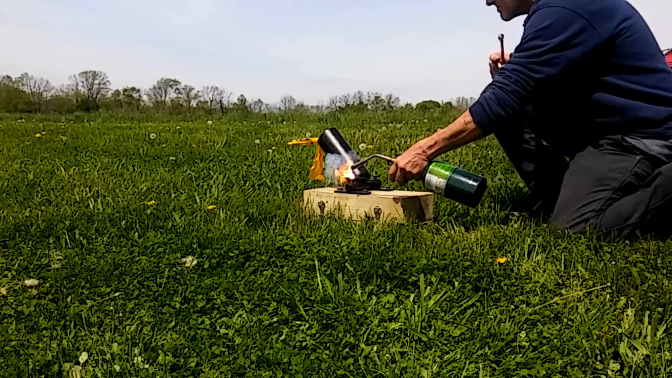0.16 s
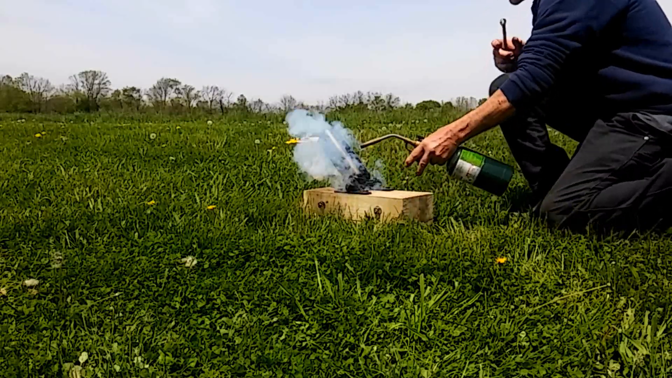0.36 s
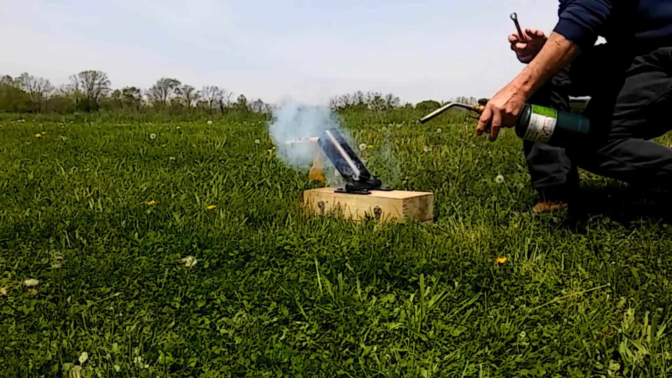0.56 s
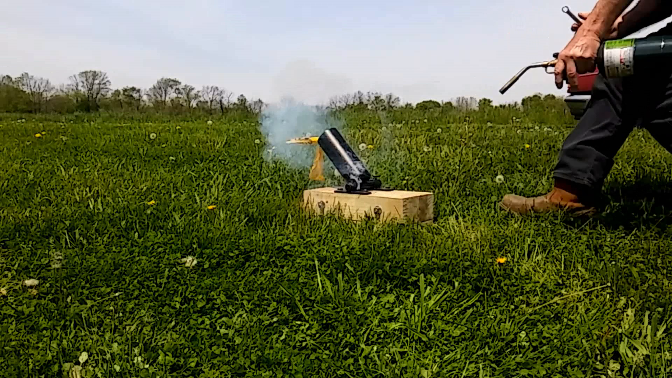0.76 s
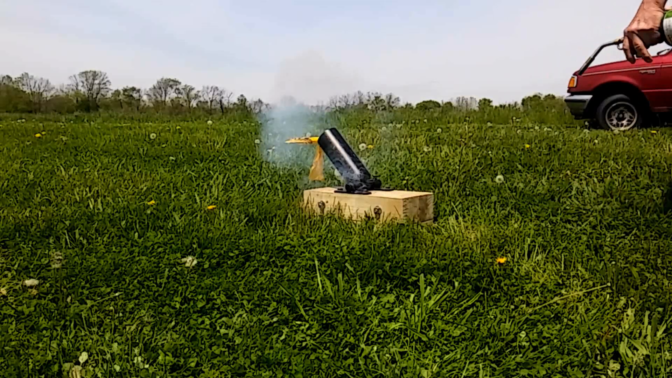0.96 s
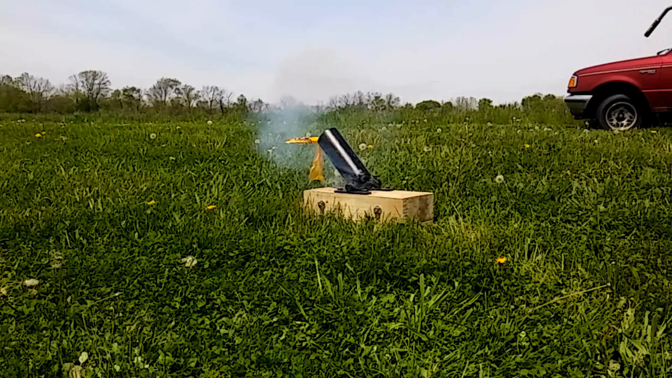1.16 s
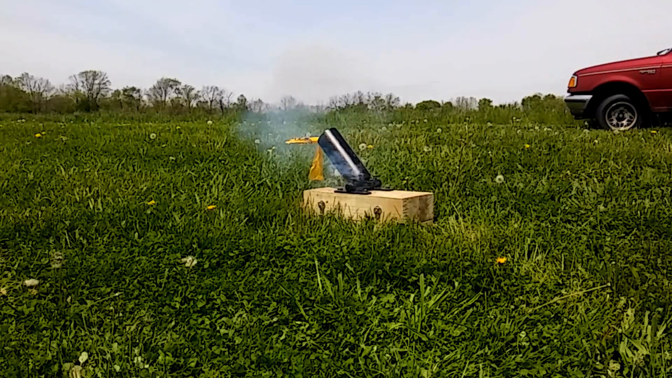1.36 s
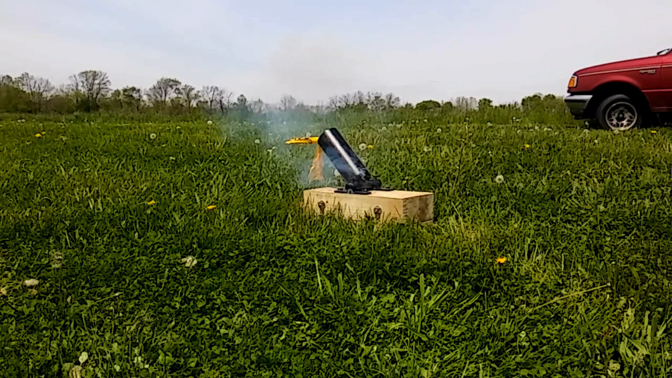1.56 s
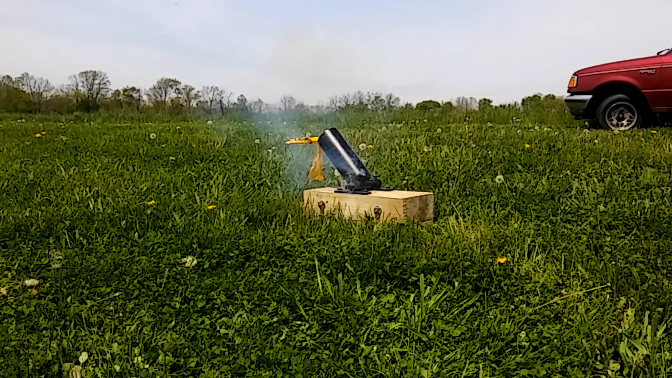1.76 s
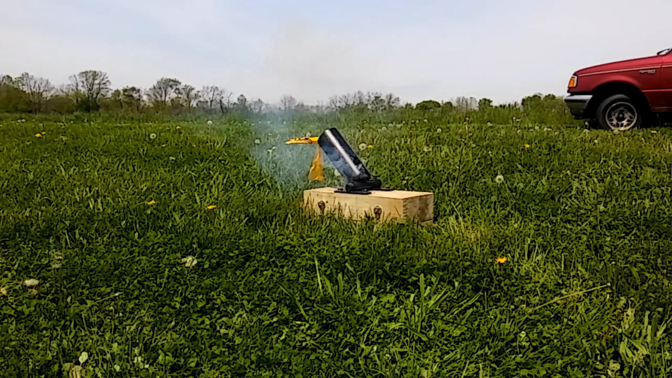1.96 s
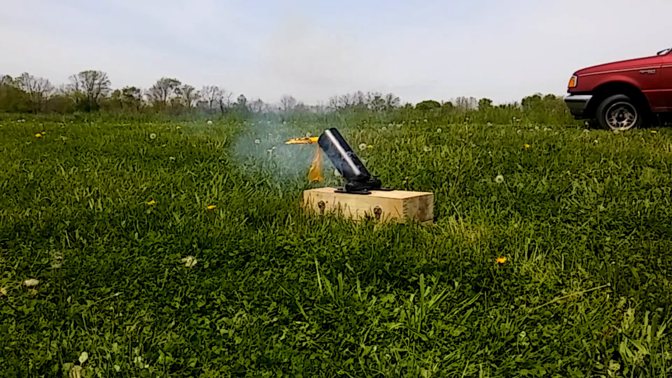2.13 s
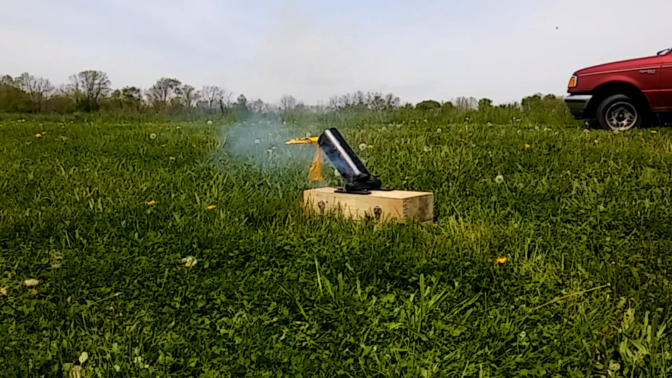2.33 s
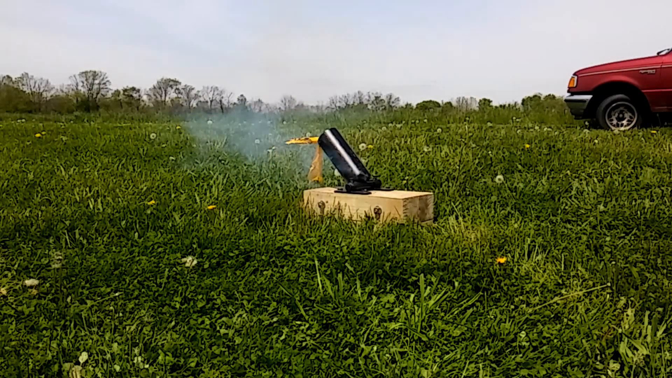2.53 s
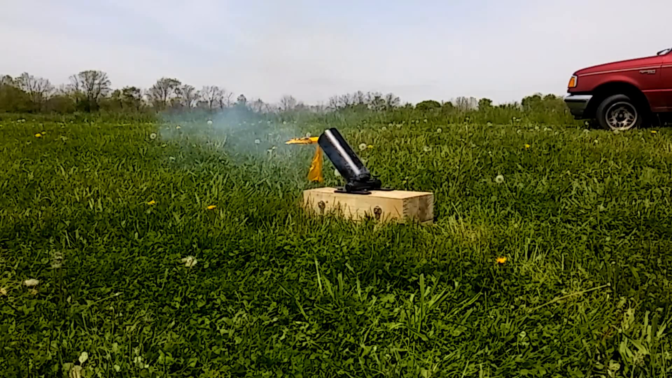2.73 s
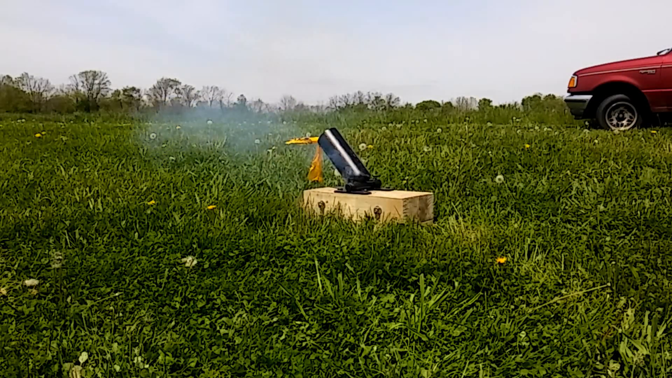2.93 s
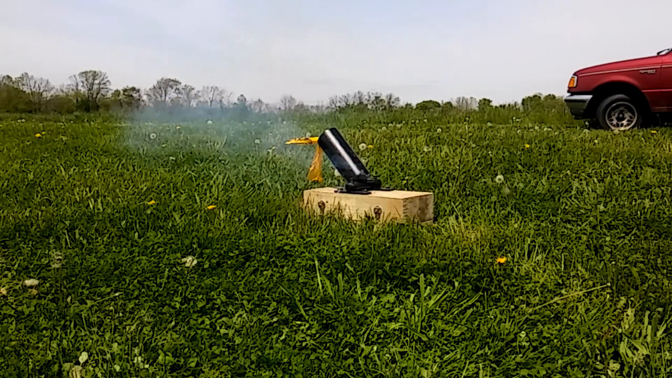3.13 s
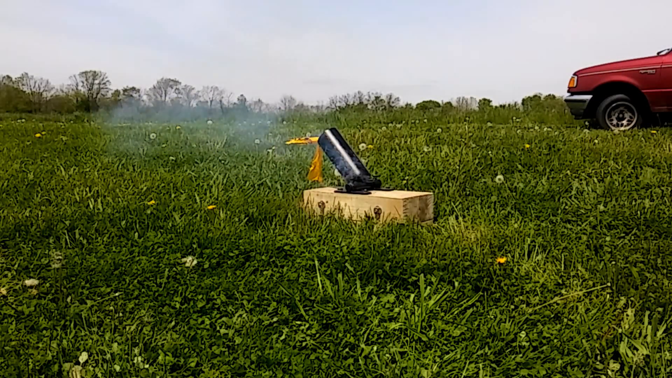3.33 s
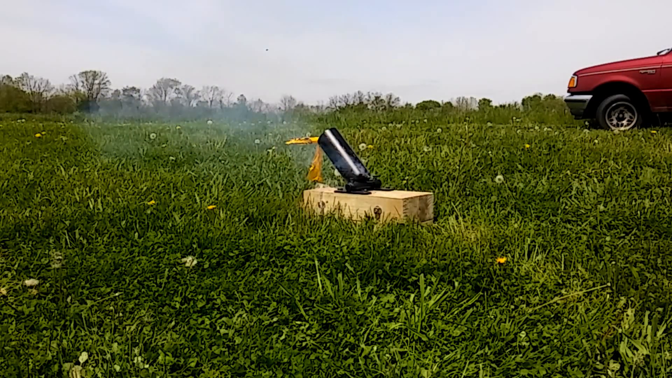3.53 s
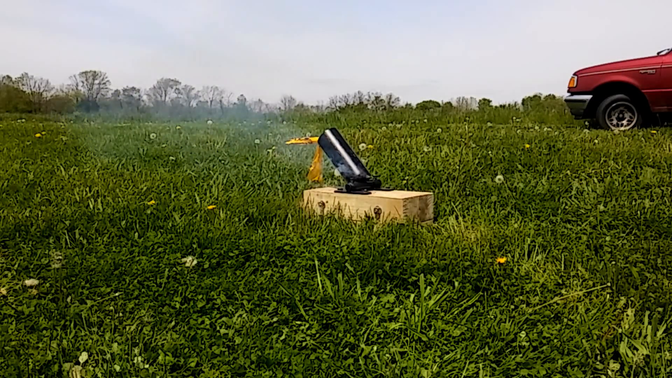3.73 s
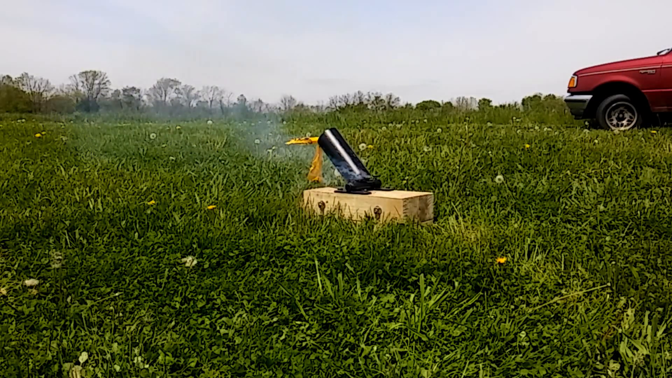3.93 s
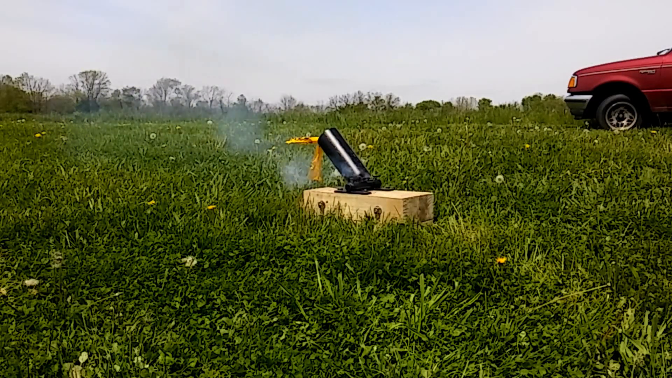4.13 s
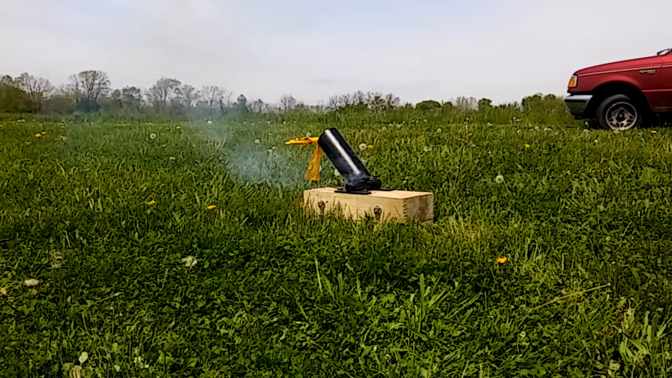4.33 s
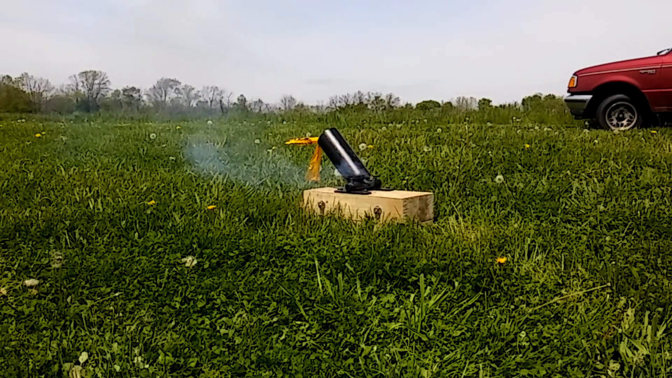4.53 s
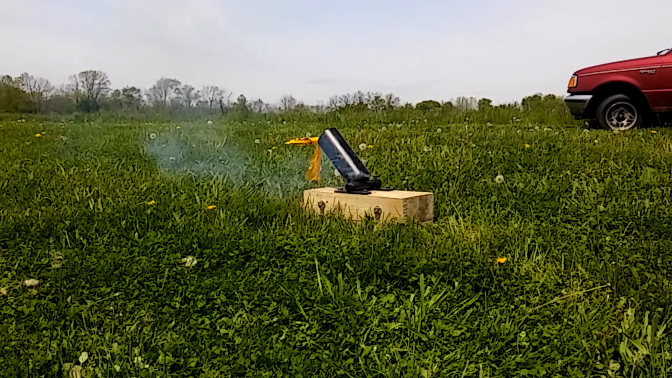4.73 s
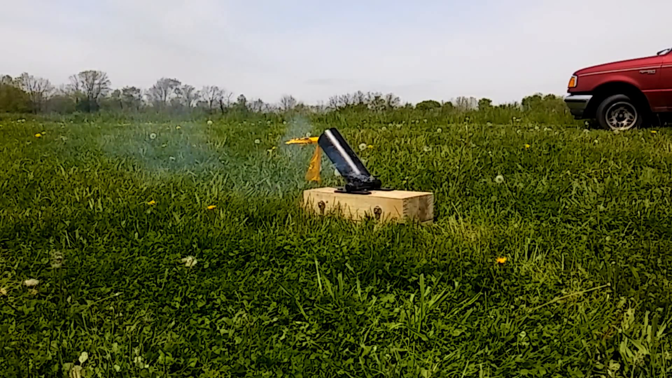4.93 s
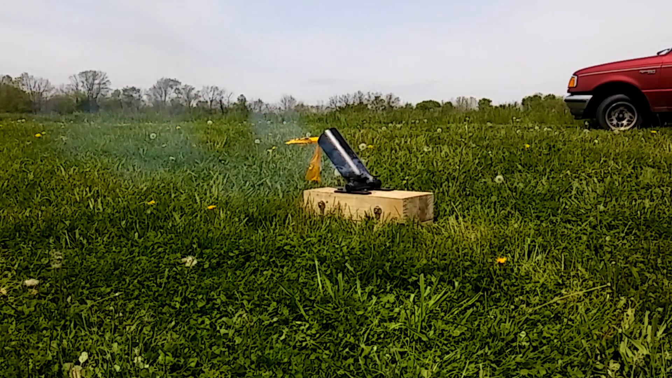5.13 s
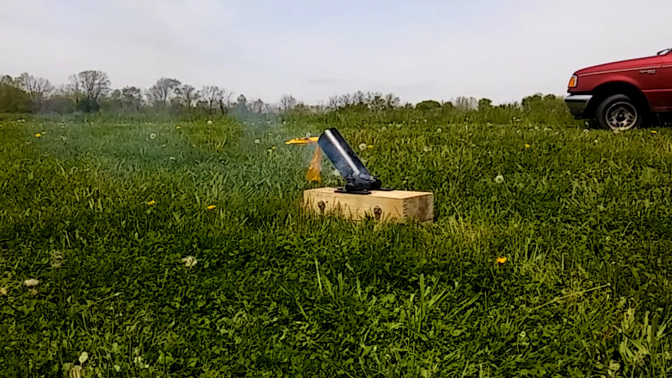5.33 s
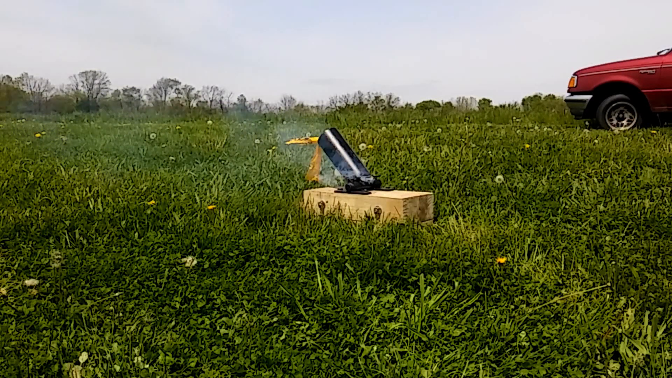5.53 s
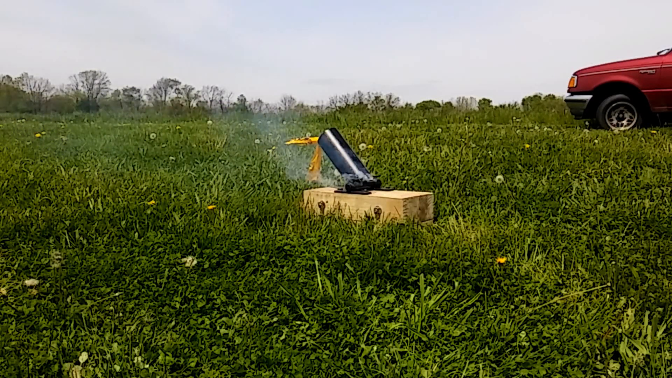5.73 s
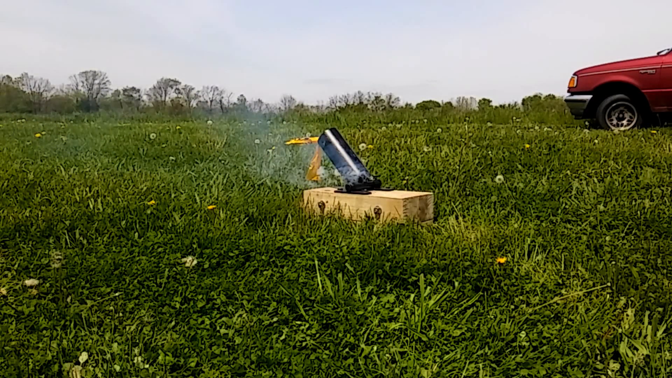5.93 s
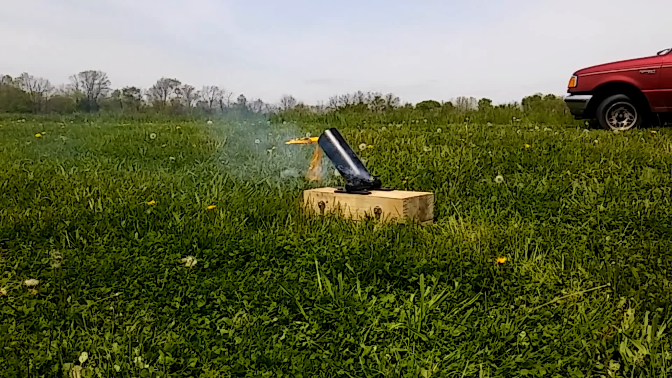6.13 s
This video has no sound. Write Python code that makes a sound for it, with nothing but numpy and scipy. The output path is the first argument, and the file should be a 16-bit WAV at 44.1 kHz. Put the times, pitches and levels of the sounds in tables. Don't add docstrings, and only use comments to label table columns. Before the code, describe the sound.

Brief fluttering torch flame, a few torn whistles as a fuse catches, then steady bright uneven fizzing hiss outdoors with faint thuds and ticks.

```python
import sys
import numpy as np
from scipy import signal
from scipy.fft import rfft, irfft, next_fast_len
from scipy.io import wavfile
from scipy.ndimage import uniform_filter1d, map_coordinates

SR = 44100
rng = np.random.default_rng(int(sys.argv[2]) if len(sys.argv) > 2 else 0)


def master_out(mix):
    frames = np.transpose(np.atleast_2d(mix))
    ceiling = np.clip(frames, -1, 1)
    pcm = np.round(ceiling * 32767).astype(np.int16)
    wavfile.write(sys.argv[1], SR, pcm)


def gain_from_db(level_db):
    decades = np.asarray(level_db, float) / 20
    return 10 ** decades


N = 277464
TIME = np.arange(N) / SR


def curves(table):
    s, *columns = np.transpose(table)
    return [np.interp(TIME, s, column) for column in columns]


def colour(x, points):
    hz, db = np.transpose(points)
    size = next_fast_len(len(x))
    log_hz = np.log(np.arange(size // 2 + 1) * SR / size + 1)
    gain = gain_from_db(np.interp(log_hz, np.log(hz), db))
    return irfft(rfft(x, size) * gain, size)[:len(x)]


def band(x, lo_hz, hi_hz, order=2):
    return signal.sosfilt(signal.butter(order, [lo_hz, hi_hz], "band", fs=SR, output="sos"), x)


def unit(x):
    return x / np.sqrt(np.mean(x ** 2))


def noise():
    return rng.standard_normal(N)


def walk(rate_hz):
    hold = int(SR / rate_hz)
    steps = np.repeat(rng.standard_normal(N // hold + 1), hold)
    smooth = uniform_filter1d(uniform_filter1d(steps, hold), hold)
    return unit(smooth[:N])


def slowly(shape, table):
    t = TIME[::32]
    return np.interp(TIME, t, sum(shape(t, *row) for row in table))


def bumps(table, size):
    def bell(t, s, height, half):
        return size(height) * np.exp(-((t - s) / half) ** 2)
    return slowly(bell, table)


def knocks(table, sag=0., rise=1.):
    out = np.zeros(N)
    for s, db, hz, cycles in table:
        span = slice(max(int((s - .1) * SR), 0), int((s + .1) * SR))
        turns = (TIME[span] - s) * hz
        length = cycles * np.where(turns < 0, rise, 2 - rise)
        swell = np.exp(-2 * (turns / length) ** 2)
        out[span] += gain_from_db(db) * swell * np.sin(2 * np.pi * turns * (1 - sag * np.tanh(turns)))
    return out


def torch():
    # time in seconds, peak in dB, pitch in Hz, length in cycles.
    puffs = [(.006, -33, 590, 7), (.028, -28.5, 598, 10.7), (.0552, -26.5, 626, 2.2), (.0617, -30, 624, 5.),
             (.0698, -32, 615, 5.), (.0812, -32, 605, 4.8), (.0945, -28, 603, 8.1), (.111, -29, 624, 5.5),
             (.136, -27.5, 590, 6.2), (.147, -25, 575, 5), (.147, -38, 1120, 12), (.2, -31, 428, 5.3),
             (.177, -31, 586, 9), (.193, -26, 570, 10.5), (.206, -30, 540, 4.8), (.222, -21, 590, 1.9),
             (.245, -35, 590, 6), (.26, -28, 527, 2.9), (.283, -27.5, 606, 3.9), (.302, -31, 650, 5.4),
             (.1, -38, 1100, 6), (.228, -42, 1000, 5), (.312, -43, 750, 8), (.347, -43, 353, 5),
             (.385, -39, 547, 6)]
    # time in seconds, change in dB, half length in seconds.
    gutters = [
        (.044, -3, 0.0055),
        (.125, -5, 0.0055),
        (.158, 3, .006),
        (.233, -1, .005),
        (.272, 0, .004),
    ]
    # pitch in Hz, level in dB per Hz.
    roar_tone = [(50, -54), (110, -26.5), (210, -8.5), (450, -7), (600, -9), (750, -10), (1100, -18),
                 (1300, -26), (1500, -60), (2500, -100)]
    # pitch in Hz, level in dB per Hz.
    nozzle_tone = [(780, -45), (1330, -8.5), (1810, 0.5), (2220, -5.5), (2390, -2), (2730, -5),
                   (3460, -5.5), (3640, -4), (3750, -12.5), (4610, -5.5), (6340, -10), (6540, -8.5),
                   (7950, -11), (9470, -21), (15500, -31)]
    # pitch in Hz, gain in dB.
    ground_dip = [(1150, 0.5), (1340, -8), (1600, 0)]

    tube_hz, tube_width_hz, tube_db = 590., 54, -41.5
    tube = unit(band(noise(), tube_hz - tube_width_hz / 2, tube_hz + tube_width_hz / 2, order=1))
    singing = knocks(puffs) + tube * gain_from_db(tube_db) * np.interp(TIME, [.3, .34], [1, 0])

    roar_shut_s, roar_fall_db_s = .31, 112
    roar_db = -37.5 - np.clip(roar_fall_db_s * (TIME - roar_shut_s), 0, 19.)
    flutter_db = bumps(gutters, float) + 1.0 * walk(52.0)
    roar = unit(colour(noise(), roar_tone)) * gain_from_db(roar_db + flutter_db)
    roar = roar * np.interp(TIME, [.45, .62], [1, 0])

    nozzle_turn_s, nozzle_fall_db_s = 0.29, 28.
    nozzle_db = -40.5 - nozzle_fall_db_s * np.maximum(TIME - nozzle_turn_s, 0)
    nozzle = unit(colour(noise(), nozzle_tone)) * gain_from_db(nozzle_db)
    nozzle = nozzle * np.interp(TIME, [.28, .5], [1, 0])
    return singing, colour(roar, ground_dip), colour(nozzle, ground_dip)


def gusts():
    # time in seconds, peak in dB, half length in seconds.
    wind_puffs = [(0.0, -50, 0.026), (.4, -63, .03), (.48, -65, .02), (1.72, -65, .05), (2.08, -73, 0.022),
                  (2.28, -56, 0.046), (2.91, -66, 0.13), (3.108, -64, 0.037), (3.35, -57, 0.086),
                  (3.515, -54, 0.018), (3.593, -61, .025), (3.67, -71, .06), (3.94, -58, 0.033),
                  (4.13, -54.5, 0.05), (4.375, -54, 0.06), (4.25, -67, 0.045), (4.49, -61, .03),
                  (4.57, -52.5, 0.039), (4.676, -50, 0.033), (4.743, -49.5, 0.022), (4.846, -54, 0.064),
                  (4.938, -62, 0.065), (5.04, -55, 0.079), (5.25, -59, 0.065), (5.582, -55.5, 0.1),
                  (6.22, -60, 0.021), (6.282, -50, 0.017)]
    calm_db = -70
    return gain_from_db(calm_db) + bumps(wind_puffs, gain_from_db)


def air():
    # time in seconds, murmur in dB, its upper part (from 360 Hz) against it in dB.
    air_levels = [(.5, -56, -0.2), (.95, -58, -1), (1.1, -59, -1), (1.45, -54, -2), (1.8, -59, -1),
                  (2.3, -57.5, 0.5), (2.7, -60.5, 1.1), (3.2, -58, -0.5), (3.45, -59, -2), (3.6, -58.5, -1),
                  (3.95, -60.5, 1), (4.3, -60, -2), (4.65, -60.5, -1), (4.95, -58.5, -1), (5.2, -60, -1),
                  (5.55, -60, -2.5), (5.95, -57.5, -4), (6.3, -59.5, -5)]
    # time in seconds, level in dB.
    rustle = [(.45, -1), (.53, 10), (.62, 0), (.9, 1.5), (1.02, 6.5), (1.2, -1), (1.7, 2.5), (2.1, 2),
              (2.3, 1), (2.6, -1), (2.75, 3), (2.9, -5), (3.1, -1), (3.9, 3), (4.3, 1), (5., 2), (5.9, 0.5),
              (6.3, -2)]
    # pitch in Hz, level in dB per Hz.
    field_tone = [(12, -54), (20, -31), (27, -13), (47, -27), (113, -2), (178, -5), (300, -3), (448, -2),
                  (669, -2.5), (901, -4.5), (1300, -22), (1690, -18), (2860, -120)]
    # pitch in Hz, level in dB per Hz.
    wind_tone = [(8.8, -50), (15, -26), (22, -21), (45, 3), (64, 8), (92, 7.5), (203, 6), (300, -20),
                 (390, -44), (660, -120)]

    murmur, field = unit(colour(noise(), field_tone)), 0
    air_db, upper_db = curves(air_levels)
    rustle_db = curves(rustle)[0]
    edges_hz = [10, 180, 360, 600, 900, 4000]
    for lo_hz, hi_hz in zip(edges_hz, edges_hz[1:]):
        mask = [(lo_hz / 1.15, -40), (lo_hz, -6), (lo_hz * 1.15, 0),
                (hi_hz / 1.15, 0), (hi_hz, -6), (hi_hz * 1.15, -40)]
        if hi_hz == 4000:
            part_db = rustle_db + 1.2 * walk(12.)
        else:
            part_db = (hi_hz in (600, 900)) * upper_db + 1.5 * walk(12.)
        field = field + colour(murmur, mask) * gain_from_db(part_db)
    wind = unit(colour(noise(), wind_tone)) * gusts() * gain_from_db(-4.5 + 1.2 * walk(24.83))
    return field * gain_from_db(air_db + 2.16 + 0.45 * walk(16.0)) + wind


def flares():
    # time in seconds, jump in dB (minus: the jet chokes), fade in seconds.
    flare_rows = [(.342, 4, .015), (.39, 2.5, .015), (.445, 2, 0.053), (.685, 1, 0.018), (.788, 6, 0.0079),
                  (1.351, 1, .006), (1.468, 2, 0.025), (2.552, 0.5, .03), (2.842, -0.5, .03),
                  (3.402, -0.5, .015), (5.207, 0.5, .03), (1.52, 2.5, 0.017), (2.101, 2.5, .012),
                  (2.228, 4.5, 0.016), (2.57, -0.5, .03), (2.95, 2.5, 0.044), (3.294, 4, 0.019),
                  (3.392, 1.5, 0.022), (4.05, 1.5, .015), (4.185, 1, 0.016), (4.69, 0, .015), (5.2, 1, .03),
                  (5.535, -2.5, .04), (5.577, 2.5, 0.028), (5.86, 2, 0.026), (5.93, 1.5, .03)]

    def flare(t, s, db, fade):
        return db * np.exp(-np.maximum(t - s, 0) / fade) * (t >= s)
    return slowly(flare, flare_rows)


def chokes():
    # deepest moment in seconds, depth in dB, sinking time in seconds, recovery time in seconds.
    choke_rows = [(.33, 4, 0.023, 0.022), (.37, -1, .02, .03), (.42, 1, .02, 0.033),
                  (.6, 3.5, 0.098, 0.084), (.74, 3.5, 0.019, 0.15), (.93, 2.5, 0.046, 0.037),
                  (1.03, 2.5, 0.024, 0.18), (1.42, 7, 0.17, 0.11), (1.438, 4.5, .012, .008),
                  (2.547, 4, 0.042, .006), (5.143, 2.5, .015, .01), (1.57, 2.5, .03, 0.085),
                  (1.74, 2.5, 0.037, 0.061), (2.05, 5, 0.059, 0.097), (2.092, 2.5, .015, .008),
                  (2.15, 3.5, 0.022, .12), (2.4, 5, 0.086, 0.13), (2.455, 2.5, 0.018, 0.018),
                  (2.72, 3, 0.083, 0.032), (2.825, 2.5, 0.041, 0.065), (3.28, 2.5, 0.032, .012),
                  (3.39, 2, 0.1, 0.013), (3.382, 5.5, .015, 0.011), (4.56, -1, .04, 0.022),
                  (5.19, 2.5, .03, .008), (4.705, 1, .02, .012), (4.07, 4, 0.14, .03),
                  (4.13, 3.5, 0.033, .02), (4.2, 4.5, 0.053, 0.099), (4.44, 1.5, 0.027, 0.088),
                  (4.61, 5, 0.018, 0.075), (4.7, 4.5, 0.1, 0.034), (5.15, 7.5, 0.1, 0.078),
                  (5.55, 5, 0.17, 0.063), (5.75, 6, 0.063, .11), (5.9, 2, 0.034, 0.095),
                  (5.99, 6.5, 0.059, 0.15), (6.22, 3.5, 0.095, 0.078), (6.245, 1.5, .02, .015),
                  (3.605, 3, .02, .02), (3.685, 2.5, 0.039, .015), (4.03, 1.5, .02, .02),
                  (4.48, 2, .03, .02), (5.72, 0.5, .03, .02)]

    def choke(t, s, db, sink, back):
        return np.interp(t, [s - sink, s, s + back], [0, -db, 0])
    return slowly(choke, choke_rows)


def eddies(x):
    depth_db, width_hz, life_s = 1.65, 170., .03
    hz, s, cells = signal.stft(x, SR, nperseg=1024)
    patches = rng.standard_normal((200, 400))
    place = np.meshgrid(hz / width_hz, s / life_s, indexing="ij")
    gain = gain_from_db(depth_db * map_coordinates(patches, place, order=1))
    return signal.istft(cells * gain, SR, nperseg=1024)[1][:N]


def fuse():
    # time in seconds, strength in dB,
    # swing away from the microphone in dB (more is duller).
    burn = [(.2, -46.5, 3), (.46, -40.5, 3), (.6, -39.5, 1), (1.2, -40.5, -0.5), (1.9, -41.5, 0.5),
            (2.3, -39, -0.5), (2.9, -40, 0.5), (3.3, -42.5, 0.5), (3.55, -41.5, 1), (3.9, -40, 3),
            (4.4, -40.5, 0.5), (4.8, -43, 1.5), (5.05, -45, 3), (5.24, -39.5, -2.5), (5.36, -43, 2.5),
            (5.62, -41, -4.5), (5.9, -41, -1.5), (6.3, -42.5, -2.5)]
    # time in seconds, share from 0 to 1.
    creeping = [
        (0, 0.03),
        (2., 0),
        (3.6, 0.33),
        (4.3, 0.74),
        (5., 0.99),
        (6.3, 0.94),
    ]
    # pitch in Hz, level in dB per Hz.
    far_tone = [(850, -58), (1450, -25.5), (1590, -18), (1800, -10), (2200, -12.5), (2500, -7), (3250, -9),
                (3620, -8.5), (4030, -10.5), (4400, -8.5), (6670, -1), (7440, -4), (8140, -9), (9820, -13),
                (11200, -19), (14200, -17.5), (15500, -20.5)]
    # pitch in Hz, level in dB per Hz.
    near_tone = [(820, -47), (1400, -64), (1690, -17), (2140, -5), (2640, -12.5), (3190, -3), (3390, -3.5),
                 (3950, -3.5), (4630, -11), (6330, -3), (7440, -6.5), (9560, -6.5), (10500, -6.5),
                 (13700, -10), (15500, -11.5)]
    # time in seconds, change in dB (plus: the bare flame shows),
    # half length in seconds.
    veils = [(.35, -1.5, .015), (.7, 1, .02), (.76, -1, .04), (.97, 2.5, .05), (1.08, -1, .04),
             (1.4, -2, .08), (1.45, -3, .015), (2.03, -2, .04), (2.27, -1, .05), (2.45, -3, 0.085),
             (2.81, -5, 0.027), (2.9, 2.5, .05), (3.27, -5, .02), (3.57, 2, .04), (4.0, -3, .05),
             (4.16, -3, .03), (4.41, 2.5, .06), (4.63, 2.5, .03), (5.13, 2.5, .05), (5.18, 0, .02),
             (5.34, -3.5, .05), (5.5, 2.5, .04), (5.86, 0.5, .04), (5.98, -3, .03)]
    # time in seconds, change in dB, half length in seconds.
    flicks = [(.55, -2, .08), (.77, -2, 0.1), (1.62, -1, 0.029), (2.25, -0.5, .06), (2.75, 0.5, .07),
              (2.92, -4, 0.064), (3.25, 1.5, 0.075), (3.45, -2.5, 0.041), (3.7, 0, 0.091),
              (3.97, -2.5, 0.1), (4.5, 1.5, .08), (5.15, -0.5, .05), (5.4, -1, 0.13), (5.57, 1.5, .04),
              (5.75, 0.5, 0.054), (6.0, 1.5, .1)]
    # time in seconds, gain in dB.
    shade = [(0, -4), (.5, 2), (.9, 1.5), (1.6, 1.5), (2.1, 0.2), (2.9, -0.5), (3.5, -0.5), (3.8, 0),
             (4.7, -1), (5.2, -2), (5.5, .5), (6.3, -0.5)]
    # time in seconds, gain in dB.
    shoulder_swell = [(.3, -1), (.8, -1), (1.2, -1.2), (1.6, -0.8), (2., 0.5), (2.45, -0.5), (2.8, 0.5),
                      (3.2, 2), (3.42, 0), (3.6, 2), (3.8, 0.1), (4.2, 0.3), (4.6, 0.7), (5., 0.5),
                      (5.3, -2), (5.6, 1), (5.9, -1.3), (6.3, 0.1)]
    # pitch in Hz, gain in dB.
    under_tone = [(1450, 0), (1720, -7), (2050, -0.5), (2350, 1.5), (2600, 0.5), (2900, -5), (3200, -0.5),
                  (3600, 0.5), (4100, -1)]

    choke_db = chokes()
    strength_db, swing_db = curves(burn)
    creep = curves(creeping)[0]
    jet_db = strength_db + choke_db + uniform_filter1d(flares(), size=100)
    sizzle_db = -7.5 + 1.5 * creep + (0.94 - 1) * choke_db - 0.12 * swing_db + bumps(veils, float)
    low_db = -7 + 2 * creep + (0.58 - 1) * choke_db + swing_db + bumps(flicks, float)

    grains = noise() * gain_from_db(0.62 * walk(1500.) + 0.38 * walk(40.))
    far, near = colour(grains, far_tone), colour(grains, near_tone)
    jet = 0
    for lo_hz, hi_hz, db in [(900, 3980, low_db - .1), (4070, 9360, 0.022), (9400, 18400, sizzle_db - .1)]:
        mask = [(lo_hz / 1.2, -60), (lo_hz / 1.04, -12), (lo_hz * 1.04, 0),
                (hi_hz / 1.04, 0), (hi_hz * 1.04, -12), (hi_hz * 1.2, -60)]
        part = (1 - creep) * unit(colour(far, mask)) + creep * unit(colour(near, mask))
        jet = jet + part * gain_from_db(jet_db + db + 0.3 * walk(18.))

    shaded = colour(jet, [(3300, -60), (3600, -6), (3800, 0), (4900, 0), (5150, -6), (5600, -60)])
    shoulder = colour(jet, [(6600, -60), (7000, -6), (7300, 0), (9000, 0), (9400, -6), (10000, -60)])
    shaded_change = (gain_from_db(curves(shade)[0]) - 1) * shaded
    shoulder_change = (gain_from_db(curves(shoulder_swell)[0]) - 1) * shoulder
    jet = eddies(jet + shaded_change + shoulder_change)

    under_from_s, under_takes_s = 5.8, 0.3
    under = np.clip((TIME - under_from_s) / under_takes_s, 0, 1)
    jet = (1 - under) * jet + under * colour(jet, under_tone)
    return jet * np.interp(TIME, [.2, .34], [0, 1])


def bounce(x):
    # start in seconds,
    # end in seconds, lag at the start in ms, lag at the end in ms, share of the sound (minus: flipped).
    faces = [
        (0, 2.9, .955, .925, .24),
        (0, 2.2, .58, .58, .13),
        (2.8, 6.6, .475, .45, -.17),
        (2.9, 4.2, .755, .74, .15),
        (4.1, 5.2, .895, .875, -.2),
        (5.1, 6.6, .745, .72, .13),
        (5.4, 6.6, .67, .65, -.15),
    ]
    out = x
    treble = colour(x, [(2500, -14), (7000, -1), (10000, -1), (15000, -6)])
    shimmer_ms = .004 * walk(6.)
    for start, end, lag_ms, later_ms, share in faces:
        span = slice(int(start * SR), int(end * SR))
        t = TIME[span]
        path_ms = np.interp(t, [start, end], [lag_ms, later_ms]) + shimmer_ms[span]
        place = (t - path_ms / 1000) * SR
        lit = np.interp(t, [start, start + .2, end - .2, end], [0, 1, 1, 0])
        echo = np.zeros(N)
        echo[span] = share * lit * map_coordinates(treble, [place], order=3)
        out = out + echo
    return out


def whistles():
    # time in seconds, peak in dB, starting pitch in Hz, ending pitch in Hz, half length in seconds.
    glides = [
        (.308, -44, 5500, 5700, .006),
        (.349, -40.5, 5500, 7200, 0.011),
        (0.39, -47, 7000, 6800, .006),
        (.402, -44, 6200, 5440, .012),
        (.435, -44, 8000, 7500, .008),
        (.456, -45, 4950, 4750, 0.013),
        (0.467, -52, 5900, 5700, .015),
        (0.48, -48, 5700, 5800, .008),
        (.52, -46, 6900, 6800, 0.027),
        (.575, -49, 6800, 6900, .01),
    ]
    width_hz = 460
    puff_cos, puff_sin = walk(width_hz * 3), walk(width_hz * 3)
    out = np.zeros(N)
    for s, db, start_hz, end_hz, half in glides:
        span = slice(int((s - .08) * SR), int((s + .08) * SR))
        t = TIME[span] - s
        phase = 2 * np.pi * np.cumsum(np.interp(t, [-half, half], [start_hz, end_hz])) / SR
        gas = puff_cos[span] * np.cos(phase) + puff_sin[span] * np.sin(phase)
        out[span] += gain_from_db(db) * np.exp(-(t / half) ** 2) * gas
    return out


def thuds():
    # time in seconds, peak in dB, pitch in Hz, length in cycles.
    thud_rows = [(.395, -44, 141, 1.8), (.553, -49, 150, 1.3), (.503, -44.5, 200, 2.4),
                 (1.376, -42.5, 500, 2), (1.678, -45, 815, 2.7), (1.399, -50, 250, 2.2),
                 (1.4139, -33, 450, 0.68), (1.4175, -45, 250, 1.1), (2.309, -44, 360, 2.7),
                 (2.157, -47, 900, 2.5), (4.675, -48, 130, 1.3), (2.123, -40, 1000, 3),
                 (2.3025, -34.5, 486, 1.2), (2.535, -51, 101, 1.6), (3.565, -42, 149, 0.77),
                 (3.6, -52, 231, 2.2), (3.95, -58, 330, 3.4), (3.806, -46.5, 287, 1.5),
                 (4.35, -46, 256, 1.2), (4.6518, -31.5, 197, 1.05), (4.741, -49, 900, 2.1),
                 (4.812, -43, 170, 0.91), (4.84, -46, 90, 0.87), (4.885, -51, 110, 2.3),
                 (5.045, -58, 79, 1.3), (5.53, -61, 121, 1.5), (5.54, -53, 155, 2.5), (5.87, -57, 288, 4),
                 (5.905, -51, 620, 8), (6.225, -50, 100, 0.81)]
    return knocks(thud_rows, sag=0.066)


def sparks():
    # time in seconds, peak in dB, pitch in Hz, length in cycles.
    spark_rows = [
        (.525, -51, 1340, 12),
        (.655, -59, 1240, 7.3),
        (1.0, -51, 1500, 9),
        (1.062, -58, 1450, 8),
        (2.123, -39, 3850, 16),
        (2.124, -37, 4400, 22),
        (2.134, -48, 4400, 10),
        (3.296, -39, 3850, 10.),
    ]
    return knocks(spark_rows, rise=0.34)


def motor():
    # time in seconds, level in dB, octave against it in dB.
    drone = [
        (.95, -78, -5),
        (1.02, -58, -3),
        (1.06, -67, -2),
        (1.15, -65, 0),
        (1.23, -58, -8),
        (1.4, -61, -16),
        (1.6, -63, -9),
        (1.72, -65, -12),
        (1.85, -79, -10),
    ]
    motor_hz, sag_hz_s = 109.8, 2.8
    level_db, octave_db = curves(drone)
    hz = (motor_hz - sag_hz_s * (TIME - drone[0][0])) * (1 + 0.011 * walk(14.))
    phase = 2 * np.pi * np.cumsum(hz) / SR
    note = np.sin(phase) + gain_from_db(octave_db) * np.sin(2 * phase)
    return np.sqrt(2) * gain_from_db(level_db - 0.5 + 2.0 * walk(30.)) * note


def scene():
    singing, roar, nozzle = torch()
    hiss = bounce(fuse() + nozzle)
    mono = hiss + singing + roar + air() + whistles() + thuds() + sparks() + motor()
    return np.array([mono, mono])


def low_pass(x):
    return signal.sosfilt(signal.butter(12, 15720, fs=SR, output="sos"), x)


def record(dry):
    # time in seconds, half length in seconds.
    drop_rows = [(.5, .02), (.56, .015), (.64, .035), (.96, .015), (1.04, .015), (1.08, .015), (1.27, .03),
                 (1.82, .02), (2.57, .03), (2.67, .025), (2.88, .035), (3.05, .025), (3.32, .04),
                 (3.6, .02), (3.72, .025), (3.83, .035), (3.95, .025), (4.27, .025), (4.42, .025),
                 (5.1, .02), (5.27, .02)]
    # time in seconds, low edge in Hz, high edge in Hz, level in dB.
    split_rows = [
        (.375, 4500, 8100, -44),
        (.377, 14400, 15400, -60),
        (.839, 8950, 10400, -54),
        (1.095, 9500, 11000, -57),
        (1.095, 13000, 14500, -57),
        (2.28, 12300, 13800, -57),
        (4.16, 8950, 10400, -54),
        (4.626, 4600, 5800, -58),
        (4.626, 12300, 14500, -63),
    ]
    faintest = colour(dry[0], [(1340, -60), (1395, 0), (1500, 0), (1560, -60)])
    dropped = np.clip(bumps([(s, 1.6, half) for s, half in drop_rows], float), 0, 1)
    side = 0
    for s, lo_hz, hi_hz, db in split_rows:
        fade = np.cos(np.pi / 2 * np.clip((TIME - s) / .02, -1, 1))
        side = side + gain_from_db(db) * fade * unit(band(noise(), lo_hz, hi_hz, order=10))
    mix = dry - dropped * faintest + side * np.array([[1], [-1]])
    return low_pass(mix)


dry = scene()
out = record(dry)
master_out(out)
```